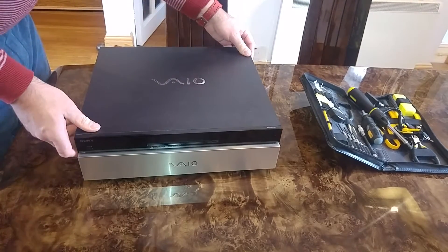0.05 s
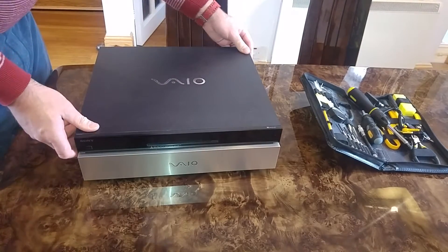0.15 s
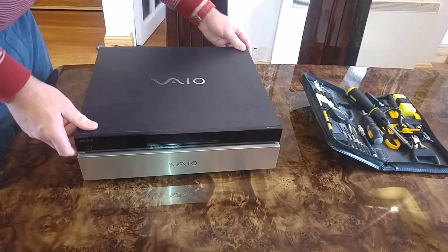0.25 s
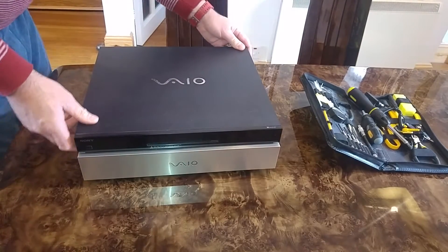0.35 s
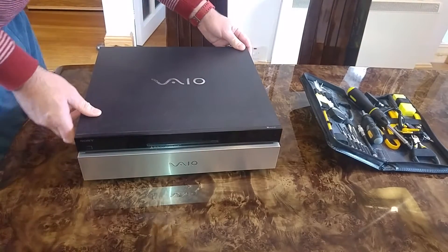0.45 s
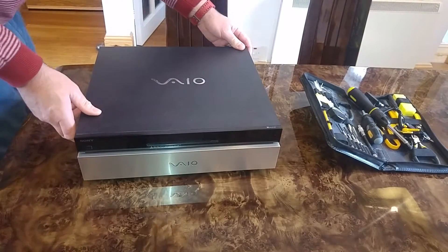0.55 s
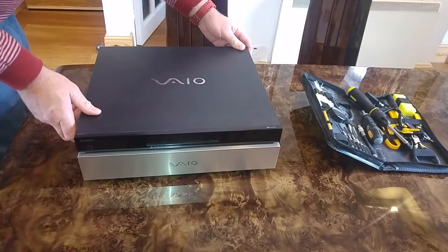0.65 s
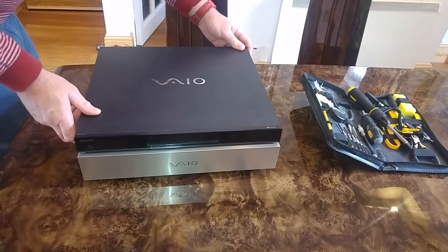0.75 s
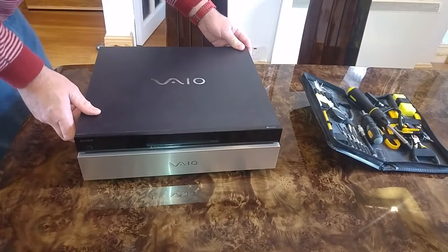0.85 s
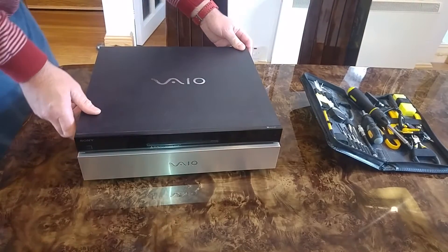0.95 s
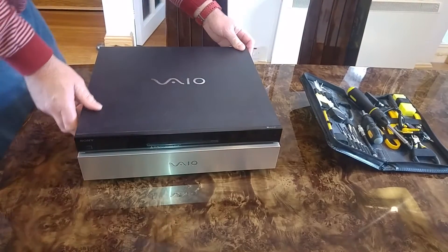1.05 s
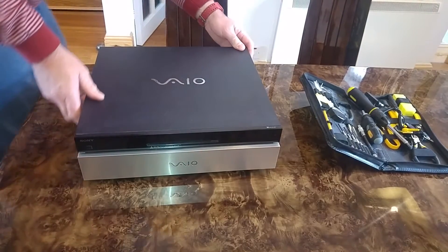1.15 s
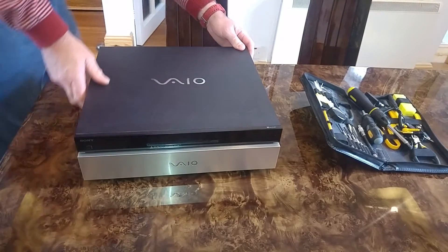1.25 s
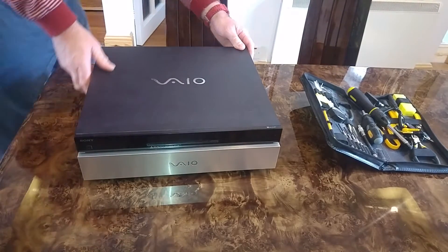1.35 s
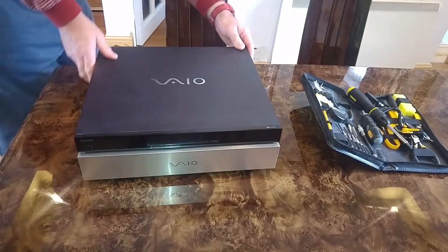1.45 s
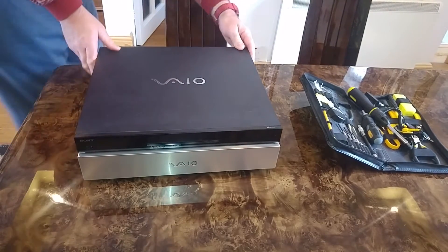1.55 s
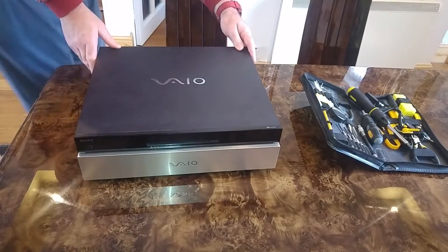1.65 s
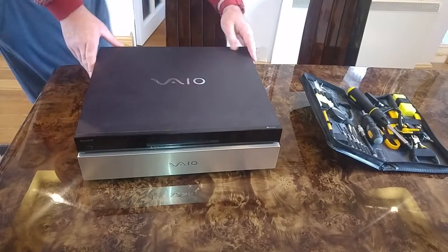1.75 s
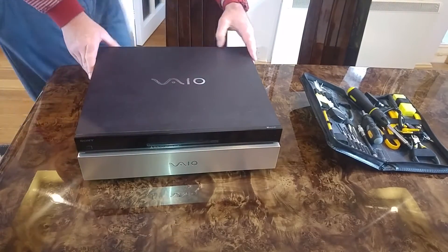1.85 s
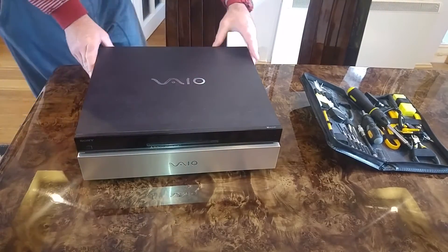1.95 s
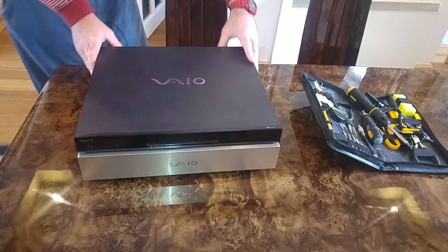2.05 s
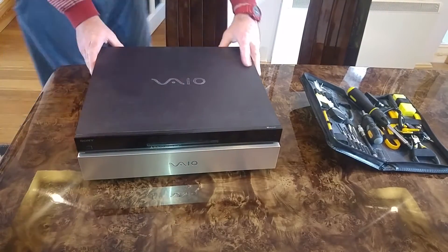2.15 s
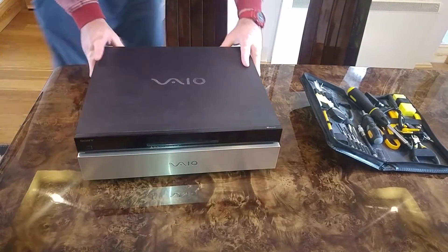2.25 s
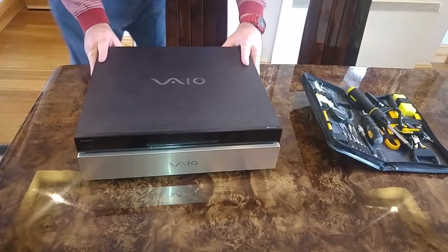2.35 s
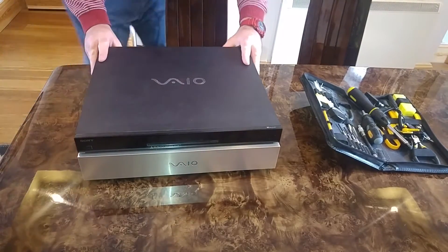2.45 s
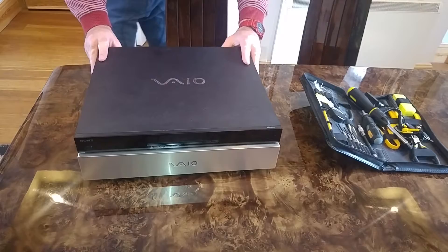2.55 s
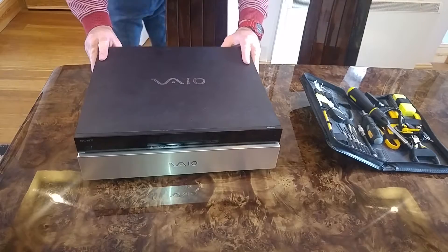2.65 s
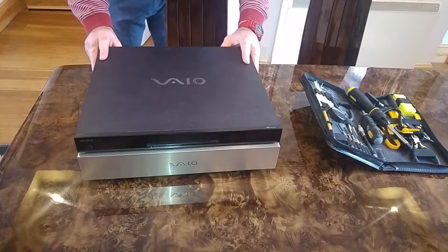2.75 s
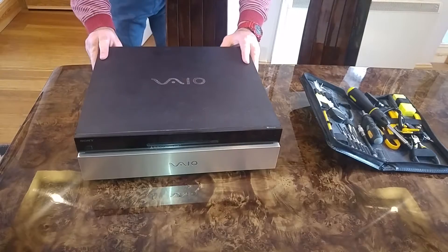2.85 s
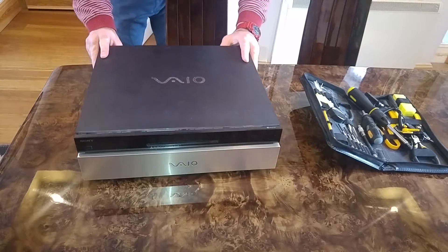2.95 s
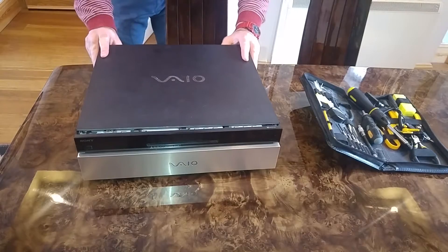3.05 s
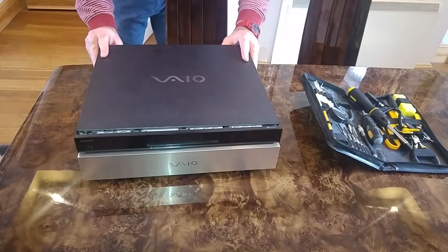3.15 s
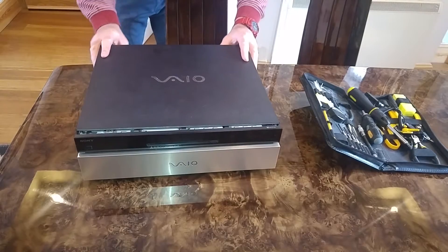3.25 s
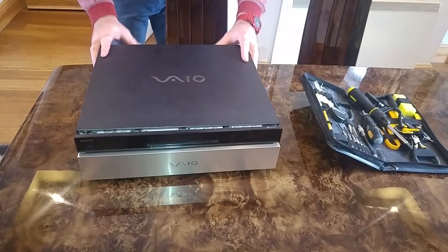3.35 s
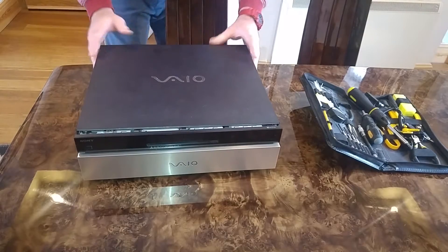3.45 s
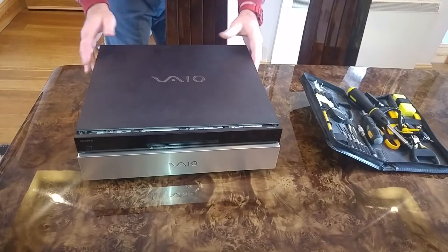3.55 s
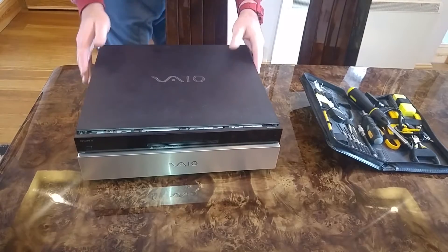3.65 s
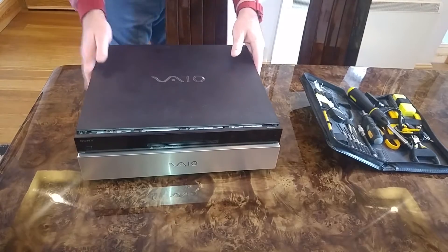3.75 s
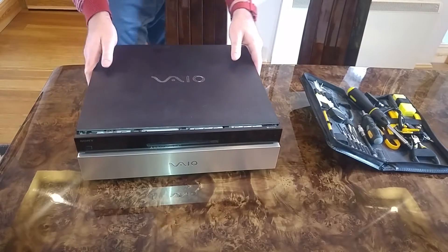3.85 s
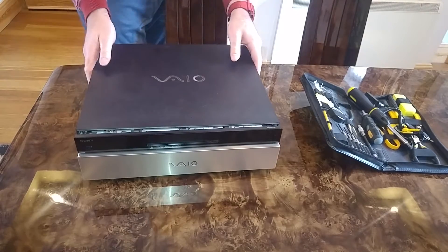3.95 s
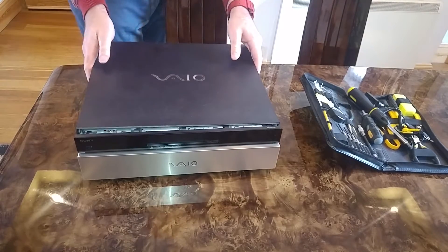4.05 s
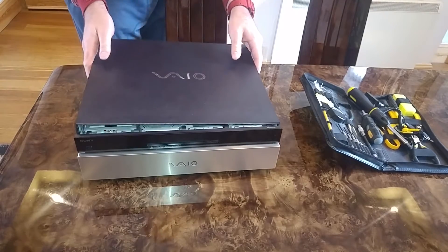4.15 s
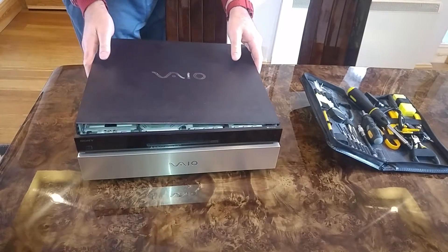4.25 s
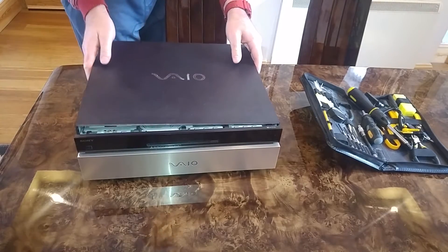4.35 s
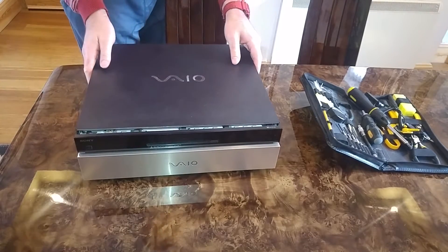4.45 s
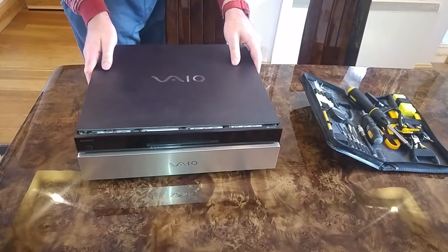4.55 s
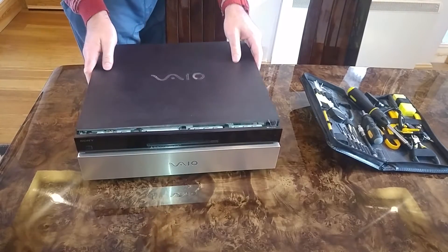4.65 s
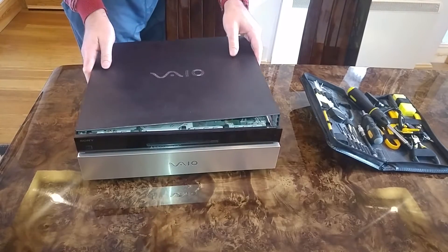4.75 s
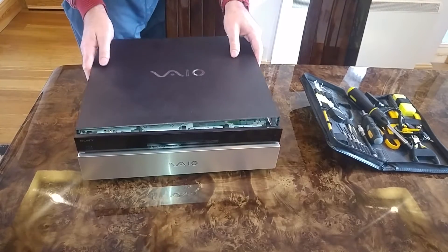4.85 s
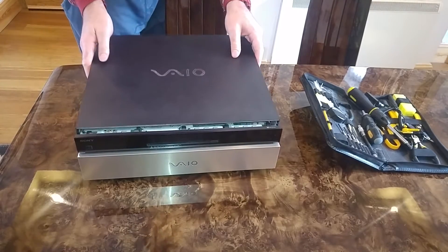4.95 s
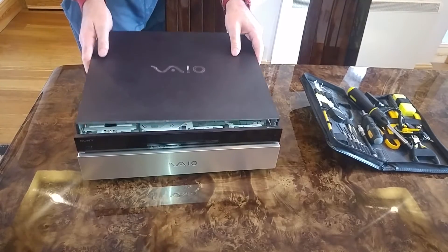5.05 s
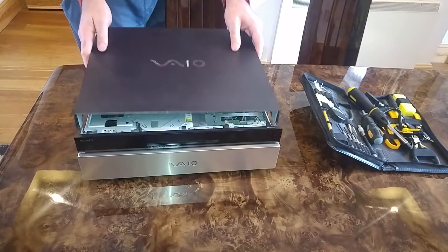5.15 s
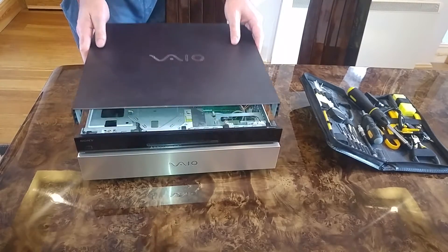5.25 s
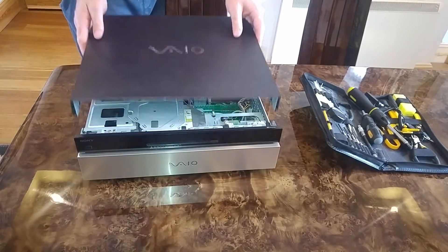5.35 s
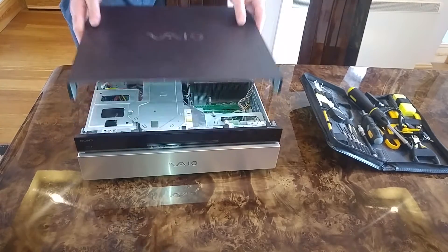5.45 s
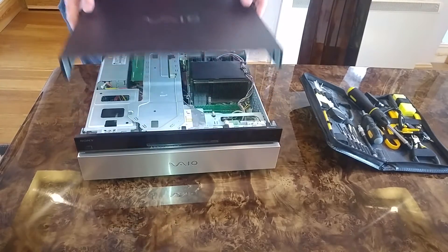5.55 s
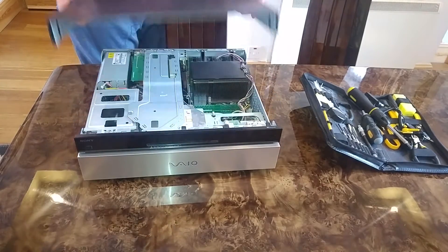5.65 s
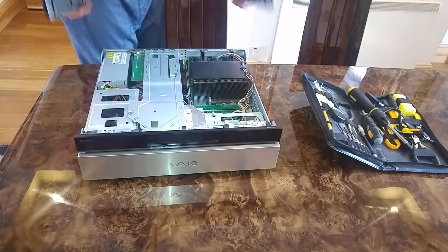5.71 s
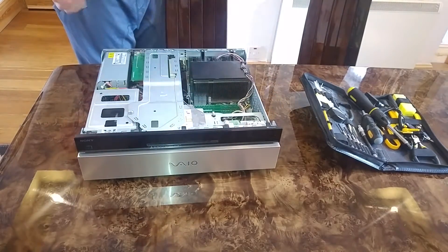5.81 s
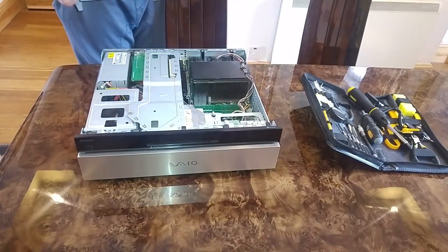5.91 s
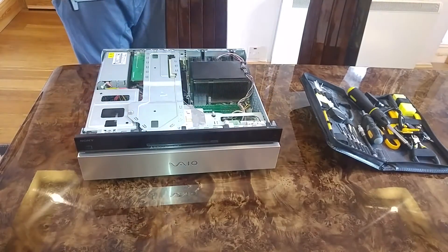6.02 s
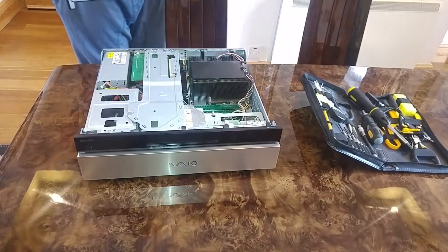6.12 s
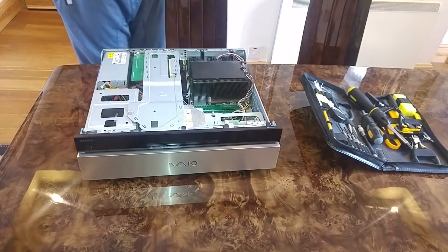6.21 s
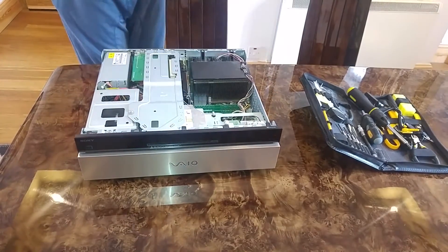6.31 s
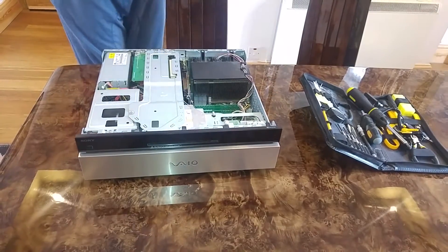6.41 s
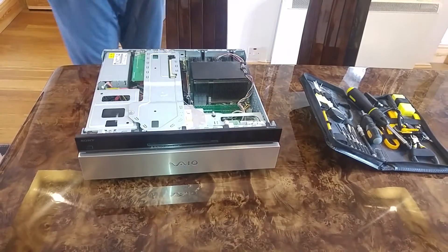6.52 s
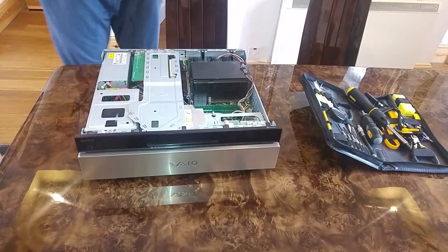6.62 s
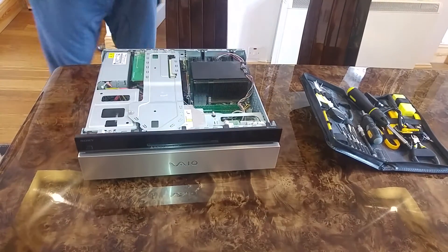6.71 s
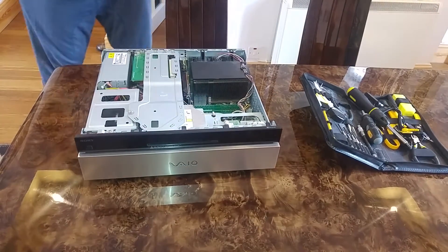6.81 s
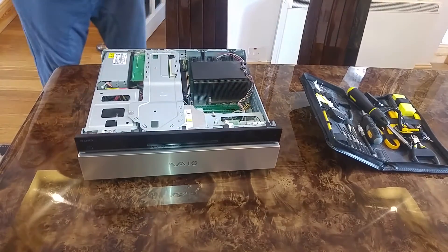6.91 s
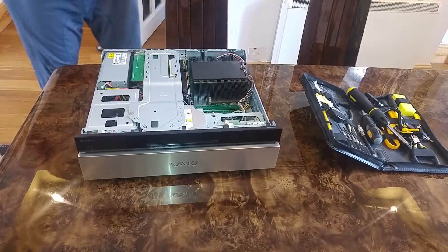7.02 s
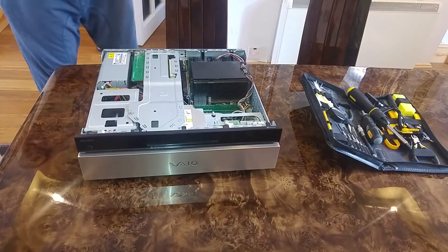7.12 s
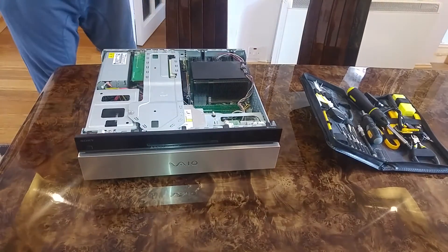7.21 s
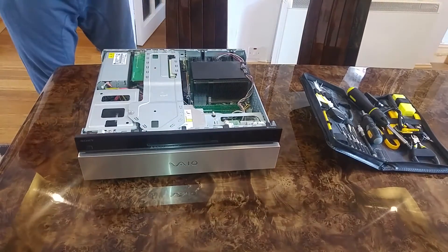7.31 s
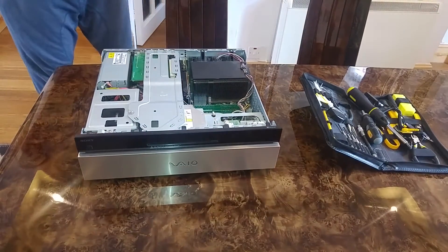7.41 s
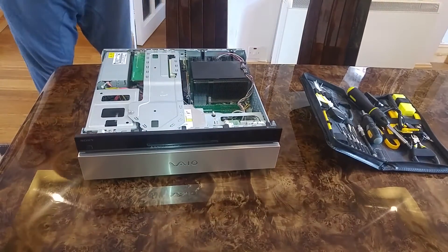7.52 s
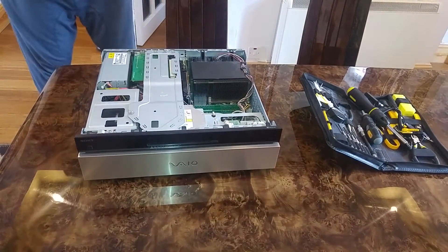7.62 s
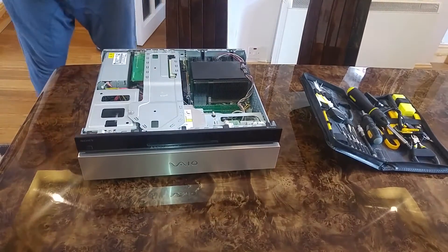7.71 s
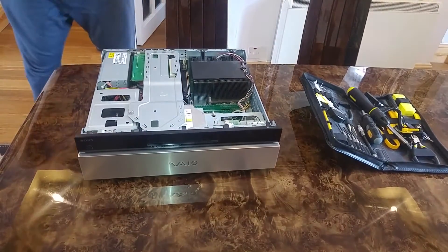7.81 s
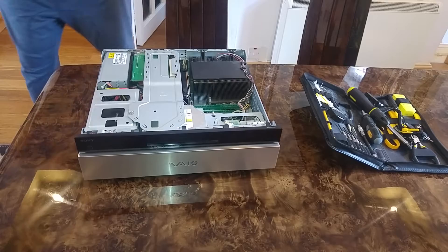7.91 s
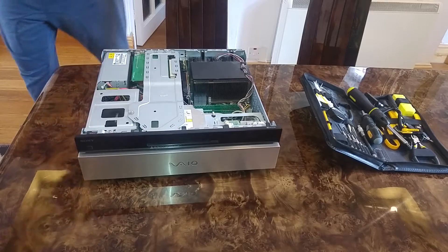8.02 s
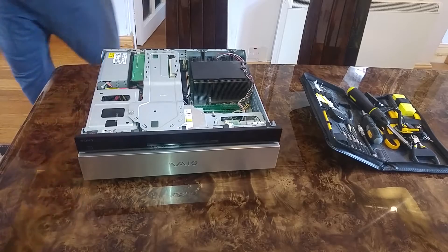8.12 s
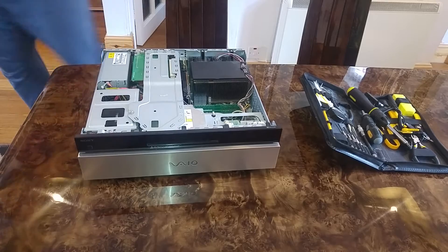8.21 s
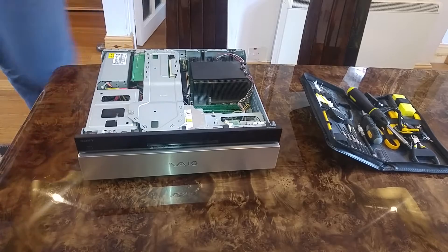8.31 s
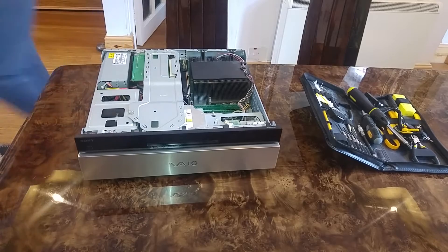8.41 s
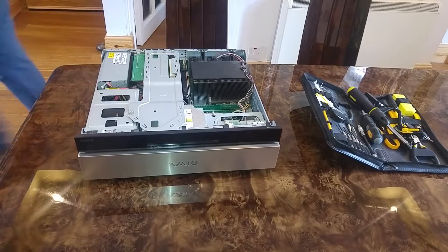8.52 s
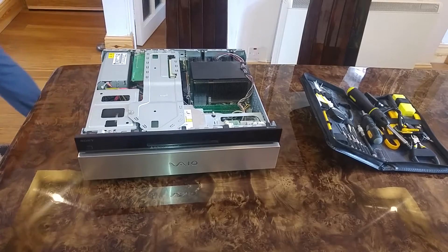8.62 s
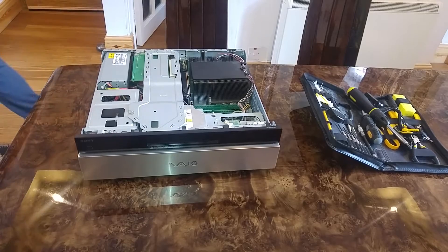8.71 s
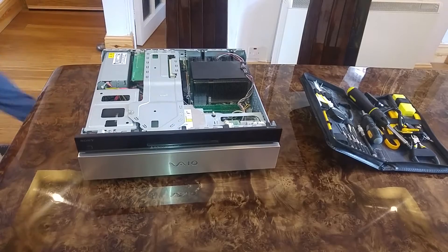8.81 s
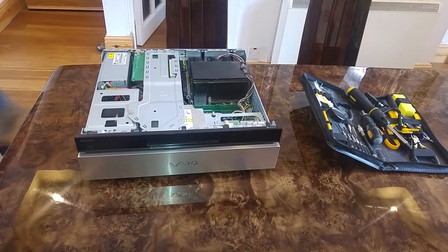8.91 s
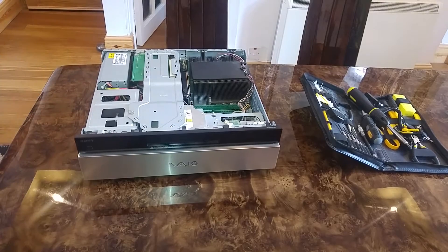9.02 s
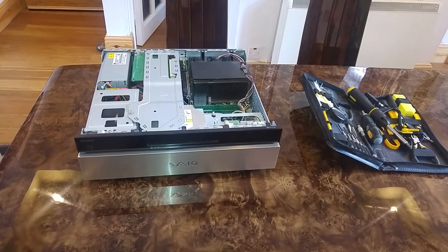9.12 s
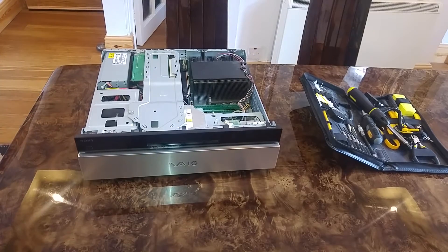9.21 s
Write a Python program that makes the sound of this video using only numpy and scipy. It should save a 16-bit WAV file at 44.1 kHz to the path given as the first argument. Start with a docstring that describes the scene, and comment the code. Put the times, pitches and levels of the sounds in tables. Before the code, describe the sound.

In a small quiet room, hands and sleeves brush over a metal computer cover, with a soft floor thump. At about three seconds it jerks loose in a loud hollow clank, then fingers judder on it. A run of knocks and short gritty scrapes frees it near five seconds. Afterwards only cloth swishes and soft footsteps remain, heard close in stereo.

```python
"""A sheet-metal computer cover is jerked off its catches, then scraped and knocked free of the chassis.
Blows set the sheet's modes ringing over dense bursts of noise; small catches keep it humming in the scrapes.
Hands rub the panel in quick slips, clothes swish as shaped noise, and soft steps make floor boards throb.
Now and then a rubbing contact squeaks. A small room answers as fading noise, over a faint room tone."""
import sys
import numpy as np
from scipy import signal
from scipy.fft import rfft, irfft, next_fast_len
from scipy.io import wavfile
from scipy.ndimage import map_coordinates

SR = 44100
rng = np.random.default_rng(int(sys.argv[2]) if len(sys.argv) > 2 else 0)


def file_out(sig):
    """Save sig as 16-bit WAV at sys.argv[1]."""
    # one column per channel
    cols = np.atleast_2d(sig).T
    # limit, then scale
    lim = np.clip(cols, -1, 1)
    pcm = np.round(lim * 32767).astype(np.int16)
    wavfile.write(sys.argv[1], SR, pcm)


N = 408807  # length in samples

# Levels in the tables are relative: the functions trim some of them further.
# Room tone: pitch_hz, level_db (per Hz)
AIR_SPECTRUM = [(20, -24.5), (45, -1.5), (84, -4), (256, -10.5), (384, -5.5), (520, -16.5), (700, -8.5),
                (2480, -20), (7300, -12.5), (16000, -22)]
# How alike the two ears are: pitch_hz, likeness (1 is identical)
EAR_LIKENESS = [(100, 0.94), (380, 0.87), (700, 0.59), (1400, 0.14), (3000, 0.076), (8000, 0.037),
                (14000, 0.21)]
# Colour difference of the two microphones: pitch_hz, left_minus_right_db
MIC_LEAN = [(60, -2), (110, -1.5), (200, -1.5), (380, -1), (700, 0), (1290, -1.0), (2380, 0), (4400, -1),
            (8120, -1), (15000, 1.5)]
# How long the room rings: pitch_hz, t60_s (time to fall 60 dB)
ROOM_DECAY = [(100, 0.51), (400, 0.32), (2000, 0.25), (7000, .24), (14000, 0.15)]

# Cloth brushing past cloth: top_speed_s, half_length_s, swish_db, fold_db
CLOTH_BRUSHES = [(0.003, 0.13, -68.5, -61), (0.456, 0.18, -52.5, -69), (0.564, 0.027, -53, -63),
                 (0.782, 0.048, -49, -57), (1.189, 0.068, -52, -67.5), (1.508, 0.26, -49, -57.5),
                 (1.801, 0.063, -59.5, -75.5), (1.95, 0.085, -54.5, -59), (2.274, 0.044, -56, -56.5),
                 (2.561, 0.33, -54, -61), (3.554, 0.16, -58.5, -62), (3.736, 0.039, -50.5, -80),
                 (3.822, 0.035, -58.5, -54), (5.915, 0.029, -58, -69), (6.417, 0.057, -50.5, -68.5),
                 (6.526, 0.018, -53.5, -63.5), (6.662, 0.0141, -50.5, -70), (6.77, 0.037, -54, -67.5),
                 (6.861, 0.021, -57.5, -65), (6.977, 0.035, -61, -60), (7.483, 0.063, -54.5, -64.5),
                 (7.78, 0.021, -60.5, -78), (8.038, 0.031, -50.5, -60.5), (8.206, 0.017, -51.5, -74),
                 (8.267, 0.041, -50, -56), (8.599, 0.086, -55, -60), (8.884, 0.049, -36, -44),
                 (8.956, 0.057, -52, -52), (9.26, 0.09, -49, -56)]
# Fine hiss of the weave: pitch_hz, level_db (per Hz)
SWISH_SPECTRUM = [(1180, -38), (2000, -14), (2110, -21), (2810, -18.5), (4650, -6.5), (4940, -9), (7190, 1),
                  (7770, -1.5), (8550, -0.5), (10400, -8.5), (15100, -11.5), (16000, -17)]
# Duller sound of the folds: pitch_hz, level_db (per Hz)
FOLD_SPECTRUM = [(90, 0), (200, -6), (300, -6.5), (400, 0), (500, -11), (700, 1.5), (1100, -7),
                 (2000, -8.5), (3200, -8.5), (6000, -21)]
# Bouts of moving about, each with a faint rustle: start_s, length_s, level_db
MOVING_BOUTS = [(0.404, 0.51, -66), (1.127, 0.72, -69.5), (3.396, 0.8, -65), (5.744, 0.61, -71.5),
                (6.288, 0.2, -65.5), (6.742, .17, -67), (7.324, 0.38, -68), (8.198, 0.2, -65)]

# Footfalls: start_s, level_db, floor_pitch_hz, push_length_s, heel_db
FOOTFALLS = [(0.761, -45, 90.2, 0.019, -43.5), (2.245, -25, 77.2, 0.017, -39),
             (7.331, -57.5, 55.5, 0.01, -71), (7.506, -55, 58.7, 0.028, -63),
             (8, -39.5, 61.4, 0.034, -51.5), (8.115, -46, 57.1, 0.0117, -84.5),
             (8.546, -54, 54, 0.026, -85), (8.789, -24, 56.3, 0.038, -54)]
# Close floor modes that beat together: ratio_to_floor_pitch, level_db, t60_s
BOARD_MODES = [(.9, -1, 0.39), (1.12, -3.5, 0.45), (1.55, -7, 0.48), (2.5, -18.5, 0.26)]
# Heel noise: pitch_hz, level_db (per Hz)
HEEL_SPECTRUM = [(60, 11.5), (150, 4), (260, -6.5), (420, -4.5), (1000, -19), (1250, -16.5), (1400, -7.5),
                 (1560, -23.5), (8000, -43)]

# Skin on the lid and soles on the floor, singing briefly: start_s, length_s, pitch_hz, level_db
SQUEAK_NOTES = [(0.555, 0.013, 992, -55.5), (8.335, 0.044, 718, -64.5), (9.241, 0.039, 736, -55)]
# Fingers dragging on the lid: start_s, length_s, level_db
FINGER_DRAGS = [(0.627, 0.22, -61.5), (2.7, 0.32, -61), (3.372, 0.064, -53), (3.455, 0.16, -51.5),
                (3.66, 0.17, -58)]
# Resonances of the lid under the fingers: pitch_hz, width_hz, level_db
FINGER_RESONANCES = [(115, 55, -3), (189, 16, -8), (385, 30, -15), (700, 30, 2), (728, 20, 4), (770, 28, 3),
                     (980, 45, -7), (1170, 35, -7), (1950, 110, -2)]
# A palm gliding over the lid: start_s, length_s, level_db
PALM_GLIDES = [(1.092, .52, -38.5)]
# Hiss of the palm: pitch_hz, level_db (per Hz)
PALM_SPECTRUM = [(4000, -31), (6500, -5), (9000, -3), (12000, -8), (14500, -2), (16000, -5)]

# Retaining tabs letting go: start_s, level_db, pitch_hz, tilt_above_pitch_db_per_octave
TAB_SNAPS = [(2.932, -45, 1947, -14.5), (3.916, -42, 970, -0.5)]
# Hollow clack of a tab: ratio_to_pitch, level_db (per Hz)
TAB_SPECTRUM = [(.15, -35), (.38, -8), (.7, -11), (1, 3), (1.18, -6), (1.4, -4), (2, -11), (2.6, -30),
                (3, -27), (3.4, -14), (3.9, -33), (9, -42)]
# The rim dragging on the chassis: start_s, length_s, panel_db, grit_db
RIM_SCRAPES = [(0.489, 0.1, -79, -60.5), (4.387, 0.115, -59.5, -60.5), (4.567, .04, -51, -53.5),
               (4.721, .18, -51, -50), (4.93, 0.15, -63, -57), (5.122, .06, -68, -57.5)]
# Grit in the scrape: pitch_hz, level_db (per Hz)
GRIT_SPECTRUM = [(290, -44.5), (500, -12.5), (640, -5), (820, -5), (1300, -7), (1930, -16), (3020, -15),
                 (3980, -23.5), (7210, -17), (10000, -22), (16000, -43)]

# Metal knocking on metal: start_s, panel_boom_db, hollow_ring_db, clank_db, contact_time_s
METAL_KNOCKS = [(0.1, -68, -67, -62, 0.00029), (0.282, -48, -51, -58, 0.0058),
                (1.165, -54, -58, -55.5, 0.0013), (1.936, -47, -38.5, -39.5, 0.016),
                (2.862, -59, -55.5, -51.5, 0.00066), (2.932, -48, -60, -54.5, .0005),
                (2.983, -21.5, -30, -23, 0.0018), (2.995, -28, -36, -33.5, 0.0002),
                (2.998, -29, -39.5, -38.5, 0.00037), (3.031, -22, -21, -33, .0025),
                (3.038, -27, -24.5, -33.5, 0.002), (3.1, -39, -37.5, -55, 0.0027),
                (3.244, -46, -49, -56.5, 0.0016), (3.812, -35.5, -39.5, -47.5, 0.015),
                (4.376, -58, -62.5, -57.5, 0.002), (4.54, -62, -71.5, -67, .0002),
                (4.558, -36, -42, -43.5, 0.0022), (4.581, -40.5, -44, -45.5, 0.0022),
                (4.678, -35, -46.5, -46, 0.0023), (4.706, -26, -33.5, -24.5, 0.0014),
                (4.76, -32.5, -32.5, -46, 0.0027), (4.789, -40.5, -34, -34, 0.0007),
                (4.800, -25, -36.5, -42.5, .005), (4.901, -32, -47, -37, 0.001),
                (4.953, -42, -51, -62.5, 0.0022), (6.503, -57, -64, -65.5, 0.0031)]
# Soft bumps of the hands against the cover: start_s, panel_boom_db
HAND_BUMPS = [(1.022, -52.5), (4.156, -46), (4.445, -47), (4.484, -44), (4.619, -38.5), (4.903, -29),
              (5.182, -47), (5.785, -47.5), (7.48, -53)]
# Whole lid flexing like a drum skin, the chassis shaking with it: pitch_hz, level_db, t60_s
DRUM_MODES = [(60, -21, .45), (84, -25, .3), (115, -4, .33), (136, -9, .24), (184, -11, .18)]
# Bending modes of the sheet: pitch_hz, level_db, t60_s
COVER_MODES = [(288, -11, .13), (305, -7, .15), (344, -6, .14), (362, -5, .14), (385, -7, .11),
               (408, -6, .14), (462, -15, .12), (560, -16, .16), (613, -15, .18), (654, -5, .24),
               (690, -11, .16), (718, -7, .24), (742, -11, .18), (792, -15, .22), (845, -13, .22),
               (871, -11, .25), (960, -16, .18), (1077, -15, .2), (1163, -12, .26), (1277, -12, .23),
               (1344, -9.5, .27), (1420, -15, .21), (1530, -15, .22), (1803, -18, .22), (1945, -18, .24),
               (2380, -20, .24), (2630, -23, .22)]
# Dense upper modes of the sheet: pitch_hz, level_db (per Hz)
CLANK_SPECTRUM = [(150, -25.5), (350, -14.5), (500, -14), (700, -4.5), (1300, -5.5), (2000, -8),
                  (2800, -10.5), (4200, -14.5), (9000, -42.5)]
# Bright tick of the sheet's edges: pitch_hz, level_db (per Hz)
TICK_SPECTRUM = [(1500, -36.5), (3500, -12.5), (4700, -9.5), (6000, -3), (7200, -1), (9200, -4),
                 (11000, -14.5), (14500, -17.5), (16000, -24.5)]
# Thin ring of the rim: pitch_hz, level_db
RIM_MODES = [(6391, -2), (6607, 0), (6885, -1), (7032, -1), (7332, -4), (7495, -1), (8014, -5), (8441, -6)]

LOW_CUT_HZ, TOP_HZ = 38, 15850  # bass roll-off of the microphones; upper band limit
BRUSH_RISE, BRUSH_ROUNDNESS = 0.78, 1.265  # speeding up over slowing down; 1 is a pointed swell, 2 a bell
MOVE_ATTACK_S, MOVE_RELEASE_S = 0.015, 0.018
# Rustle: folds relative to swish; depth and rate of its small random stirrings
RUSTLE_FOLD_DB, RUSTLE_SWING_DB, RUSTLE_PER_S = -4.5, 3, 11
SQUEAK_WAVER, SQUEAK_ROUGH_DB = 0.0345, 4.5  # depth of the random pitch (fraction) and level changes
SQUEAK_ATTACK_S, SQUEAK_RELEASE_S = 0.0051, 0.014
FINGER_ATTACK_S, FINGER_RELEASE_S = 0.041, 0.033
PALM_ATTACK_S, PALM_RELEASE_S = 0.23, 0.057
SLIP_HZ = 186  # middle rate of the fingertip slips
STUTTER_DB, STUTTER_PER_S = 3.5, 110  # the fingers grab and let go
SCRAPE_ATTACK_S, SCRAPE_RELEASE_S = 0.011, 0.015
# Tiny catches of the rim: rate, life, smallest and largest size
CATCH_PER_S, CATCH_T60_S, CATCH_SIZE_DB = 140, 0.041, (-6.05, 5.5)
SLIDE_SHARE = 0.5  # smooth sliding between the catches
# Flesh is soft: hollow ring and clank relative to boom, contact time
BUMP_HOLLOW_DB, BUMP_CLANK_DB, BUMP_CONTACT_S = -11, -13, 0.008
LIFT_S, FREE_DB = 4.3, 1.5  # the deepest cover modes are this much stronger before the lift, weaker after
# Contact time where tick and clank start level, before trims; tick gain each time that time halves
EDGE_CONTACT_S, EDGE_DB_PER_OCTAVE = 0.00096, 6.5
PRESS_GAIN, PRESS_T60_S = 2.5, 0.06  # the sheet is loudest while the blow still presses on it
# Whole lid: level, dB for each dB of boom, time to get going
DRUM_DB, DRUM_GROWS, DRUM_FOLLOW_S = 6, 1.38, 0.019


def amp(db):
    """Turn decibels into gain."""
    return 10 ** (np.asarray(db) / 20)


def unit(x):
    """Scale x to an average (rms) level of 1."""
    return x / np.sqrt(np.mean(x ** 2) + 1e-20)


def along(points, hz):
    """Read a value between (pitch_hz, value) points on a log pitch axis."""
    pitch, value = np.transpose(points)
    return np.interp(np.log(hz + 1), np.log(pitch + 1), value)


def ear_angle(hz):
    """Half the angle between two ears whose likeness is its cosine."""
    return np.arccos(np.clip(along(EAR_LIKENESS, hz), -1, 1)) / 2


def wobble(rate):
    """A smooth random curve through `rate` random points a second."""
    knots = rng.standard_normal(int(N * rate / SR) + 4)
    return map_coordinates(knots, [np.arange(N) * rate / SR])


def filtered(x, response):
    """Multiply the spectrum of x by a response of frequency."""
    n = x.shape[-1]
    padded = next_fast_len(n + SR // 4)
    spectrum = rfft(x, padded) * response(np.fft.rfftfreq(padded, 1 / SR))
    return irfft(spectrum, padded)[..., :n]


def resonances(modes, hz):
    """Summed response of (pitch_hz, width_hz, level_db) resonances that ring only after a push."""
    return sum(amp(db) * 1j * hz * width / (centre * centre - hz * hz + 1j * hz * width)
               for centre, width, db in modes)


def noise(spectrum, size):
    """Stereo noise of rms 1: bass much alike in both ears, treble mostly unrelated."""
    def middle_and_side(hz):
        angle = ear_angle(hz)
        return amp(along(spectrum, hz)) * [np.cos(angle), np.sin(angle)]
    mid, side = filtered(rng.standard_normal((2, size)), middle_and_side)
    return unit(np.array([mid + side, mid - side]))


def fade(t, t60):
    """Free decay, falling 60 dB in t60 seconds."""
    return np.exp(-np.log(1000) * t / t60)


def add(track, s, sound):
    """Mix a sound into the track at time s."""
    part = track[:, round(s * SR):][:, :sound.shape[-1]]
    part += sound[..., :part.shape[1]]


def stroke(start, length, attack, release):
    """Gain of a sliding contact: it gathers speed, holds, and dies away once let go."""
    t = np.arange(N) / SR - start
    rise = 1 - np.exp(-np.maximum(t, 0) / attack)
    return rise * np.exp(-np.maximum(t - length, 0) / release)


def brush(s, half_length):
    """Gain of one cloth surface sweeping past another, fastest at time s."""
    u = (np.arange(N) / SR - s) / half_length
    distance = np.minimum(np.maximum(u, -u / BRUSH_RISE), 10)
    return np.exp(-distance ** BRUSH_ROUNDNESS)


def ring(modes, t, scatter_db, stagger):
    """One blow swings the modes at new random strengths, out of step by about `stagger` cycles."""
    hz, db, t60 = np.transpose(modes)[:, :, None]
    size, lag, spread, grip = rng.standard_normal((4, len(modes), 1))
    hz = hz + 4 * np.tanh(hz / 500) * grip  # the shifting grip detunes each mode a little
    swing = amp(db + scatter_db * size) * fade(t, t60)
    apart = np.tanh(spread) * ear_angle(hz)  # modes reach the two ears unlike
    phase = hz * t + stagger * lag
    return np.array([np.sum(swing * np.sin(2 * np.pi * phase + ear * apart), 0) for ear in (-1, 1)])


def room_tone():
    """Steady, faint noise shaped like the air of a quiet room."""
    return amp(-73.5) * noise(AIR_SPECTRUM, N)


def room(x):
    """The room's diffuse answer: noise in which each frequency dies at its own speed."""
    burst = noise([(100, 0.0074), (16000, 0.0041)], SR // 2)
    hz, t, cells = signal.stft(burst, SR, nperseg=256)
    fading = cells * fade(t, along(ROOM_DECAY, hz)[:, None])
    tail = signal.istft(fading, SR, nperseg=256)[1]
    tail = np.pad(tail / np.linalg.norm(tail[0]), ((0, 0), (SR // 150, 0)))  # short delay before the answer
    return signal.fftconvolve(x, tail, axes=1)[:, :N]


def clothes():
    """Sleeves and trouser legs brush over a faint rustle: fine hiss from the weave, duller folds."""
    swish, fold = sum(np.outer(amp(dbs), brush(s, half_length)) for s, half_length, *dbs in CLOTH_BRUSHES)
    moving = sum(amp(db) * stroke(s, length, MOVE_ATTACK_S, MOVE_RELEASE_S)
                 for s, length, db in MOVING_BOUTS)
    rustle = moving * amp(RUSTLE_SWING_DB * wobble(RUSTLE_PER_S))
    swish = np.hypot(swish, rustle)
    fold = np.hypot(fold, amp(RUSTLE_FOLD_DB) * rustle)
    weave = amp(2.1 * wobble(45) + 0.37 * wobble(840))
    hiss = swish * noise(SWISH_SPECTRUM, N)
    dull = amp(2.0 * wobble(25)) * fold * noise(FOLD_SPECTRUM, N)
    return weave * (hiss + dull)


def steps():
    """Weight comes down softly on the boards, which throb at a pitch that depends on the spot."""
    out, t = np.zeros((2, N)), np.arange(SR * 3 // 4) / SR
    for s, db, hz, push, heel_db in FOOTFALLS:
        late = t - 2 * push  # the modes swing together when the full weight has landed
        boom = sum(amp(level) * fade(late, t60) * np.sin(2 * np.pi * ratio * hz * late)
                   for ratio, level, t60 in BOARD_MODES)
        weight = 1 - np.exp(-(t / (1.5 * push)) ** 2)
        heel_shape = fade(t, 0.334) * (1 - np.exp(-t / 0.0076))
        heel = amp(heel_db + 7.0) * noise(HEEL_SPECTRUM, len(t)) * heel_shape
        add(out, s, amp(db - 5.0) * boom * weight + heel)
    return out


def squeaks():
    """A rubbing contact sticks and slips fast enough to give a faint, wavering note."""
    out = np.zeros(N)
    waver = np.exp(SQUEAK_WAVER * wobble(150))
    rough = unit(amp(SQUEAK_ROUGH_DB * wobble(90)))
    for s, length, hz, db in SQUEAK_NOTES:
        note = unit(np.sin(2 * np.pi * np.cumsum(hz * waver) / SR))
        out += amp(db) * note * rough * stroke(s, length, SQUEAK_ATTACK_S, SQUEAK_RELEASE_S)
    return out


def fingers():
    """Fingertips judder over the lid: each quick slip is a click that rings its resonances."""
    drag = sum(amp(db) * stroke(s, length, FINGER_ATTACK_S, FINGER_RELEASE_S)
               for s, length, db in FINGER_DRAGS)
    slip_hz = SLIP_HZ * np.exp(0.04 * wobble(18) + 0.1 * wobble(170))
    slips = np.diff(np.floor(np.cumsum(slip_hz) / SR), prepend=0)  # one click per whole cycle
    uneven = slips * amp(3 * wobble(55) + 2 * wobble(190))
    judder = unit(filtered(uneven, lambda hz: resonances(FINGER_RESONANCES, hz) / (1 + (hz / 1250) ** 4)))
    return drag * judder * amp(STUTTER_DB * np.tanh(wobble(STUTTER_PER_S)))


def palm():
    """A dry palm hisses along the lid as noise of slightly uneven level."""
    glide = sum(amp(db) * stroke(s, length, PALM_ATTACK_S, PALM_RELEASE_S) for s, length, db in PALM_GLIDES)
    return amp(0.62 * wobble(41)) * glide * noise(PALM_SPECTRUM, N)


def tabs():
    """A tab snaps over its slot with a short, hollow burst of noise."""
    out, t = np.zeros((2, N)), np.arange(SR // 4) / SR
    for s, db, hz, tilt in TAB_SNAPS:
        spectrum = [(ratio * hz, level + tilt * max(np.log2(ratio), 0)) for ratio, level in TAB_SPECTRUM]
        decay = fade(t, 0.24) + 1.2 * fade(t, 0.11)
        add(out, s, amp(db) * noise(spectrum, len(t)) * decay * (1 - np.exp(-t / 0.002)))
    return out


def scrape():
    """The rim catches and slips on the chassis at an uneven rate; the slips keep the panel humming."""
    panel, grit = sum(np.outer(amp(dbs), stroke(s, length, SCRAPE_ATTACK_S, SCRAPE_RELEASE_S))
                      for s, length, *dbs in RIM_SCRAPES)
    catches = (rng.random(N) < CATCH_PER_S / SR) * amp(rng.uniform(*CATCH_SIZE_DB, N))
    catch_decay = fade(np.arange(SR // 10) / SR, CATCH_T60_S)
    slips = unit(SLIDE_SHARE + signal.fftconvolve(catches, catch_decay)[:N])
    # a mode that dies faster has a wider resonance
    sheet = [(hz, np.log(1000) / (np.pi * t60), db) for hz, db, t60 in DRUM_MODES + COVER_MODES]
    push = slips * rng.standard_normal(N)
    hum = unit(filtered(push, lambda hz: resonances(sheet, hz) / (1 + (hz / 900) ** 2)))
    return panel * hum + grit * slips * noise(GRIT_SPECTRUM, N)


def contacts():
    """Each blow booms in the panel, rings hollow in its middle modes, clanks above and ticks at the edge."""
    out, t, long = np.zeros((2, N)), np.arange(SR * 2 // 5) / SR, np.arange(SR * 3 // 4) / SR
    bumps = [(s, db, db + BUMP_HOLLOW_DB, db + BUMP_CLANK_DB, BUMP_CONTACT_S) for s, db in HAND_BUMPS]
    middle = [mode for mode in COVER_MODES if 500 <= mode[0] < 900]
    rim_modes = [(hz, db, 0.24) for hz, db in RIM_MODES]
    press = 1 + PRESS_GAIN * fade(t, PRESS_T60_S)
    rattle_decay = fade(t, 0.36) + 1.6 * fade(t, 0.067)
    tick_decay = fade(t, 0.24) + 2.0 * fade(t, 0.01) + 3 * fade(t, 0.002)
    for s, boom_db, hollow_db, clank_db, contact_s in METAL_KNOCKS + bumps:
        seat_db = -FREE_DB if s > LIFT_S else FREE_DB
        low = [(hz, db + (hz < 330) * seat_db, t60) for hz, db, t60 in COVER_MODES if hz < 500]
        tick_db = clank_db + EDGE_DB_PER_OCTAVE * np.log2(EDGE_CONTACT_S / contact_s)
        tilt = 2.4 * np.tanh(np.log(0.00046 / contact_s))  # dB per octave: a brief contact is brighter
        high = [(hz, db + tilt * np.log2(hz / 1000), t60) for hz, db, t60 in COVER_MODES if hz >= 900]
        dense = [(hz, db + tilt * np.log2(hz / 1000)) for hz, db in CLANK_SPECTRUM]

        boom = amp(boom_db - 7) * ring(low, t, scatter_db=3.5, stagger=0.27)
        hollow = amp(hollow_db - 5.0) * ring(middle, t, scatter_db=0.0, stagger=0.88)
        clank = amp(clank_db - 8.5) * ring(high, t, scatter_db=3.0, stagger=0.88)
        rattle = amp(clank_db - 7.5) * noise(dense, len(t)) * rattle_decay
        tick = amp(tick_db - 3.5) * noise(TICK_SPECTRUM, len(t)) * tick_decay
        rim = amp(tick_db - 17) * ring(rim_modes, t, scatter_db=2, stagger=1)
        blow = press * (boom + hollow + clank) + rattle + tick + rim
        add(out, s, blow * (1 - np.exp(-t / contact_s)))

        drum_gain = amp(DRUM_DB + DRUM_GROWS * boom_db)  # light taps barely move the whole lid
        drum = drum_gain * ring(DRUM_MODES, long, scatter_db=0.5, stagger=0.065)
        add(out, s, drum * (1 - np.exp(-long / DRUM_FOLLOW_S)))  # the whole lid is slow to follow
    return out


def scene():
    """Clothes, steps, hands and cover in the room, over its faint tone."""
    person = clothes() + squeaks() + fingers() + palm()
    cover = tabs() + scrape() + contacts()
    echo = room(amp(-7.0) * cover + amp(-5.5) * person)
    return room_tone() + echo + steps() + person + cover


def record(dry):
    """Two microphones differ a little in colour, shed the deepest bass and stop at the band limit."""
    def microphones(hz):
        colour = amp(np.outer([1, -1], along(MIC_LEAN, hz)) / 2)
        low_cut = 1 - 1 / (1 + (hz / LOW_CUT_HZ) ** 6)
        return colour * low_cut * (hz < TOP_HZ)
    return filtered(dry, microphones)


dry = scene()
out = record(dry)
file_out(out)
```